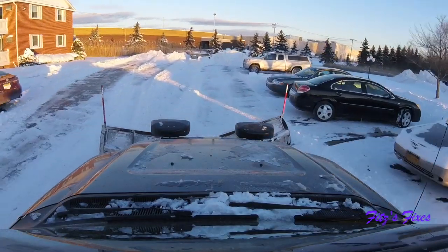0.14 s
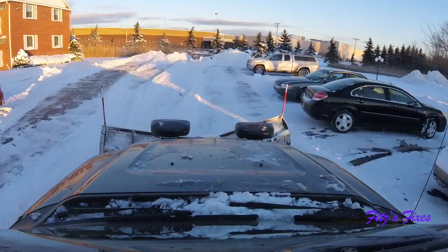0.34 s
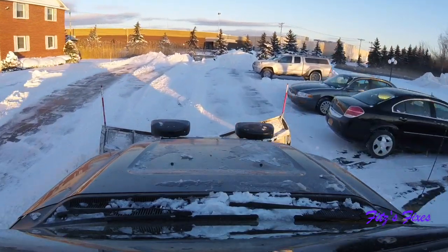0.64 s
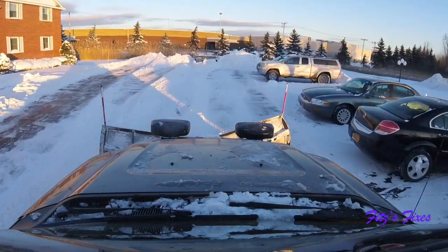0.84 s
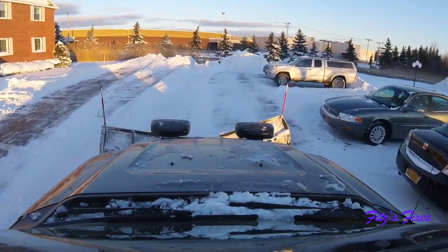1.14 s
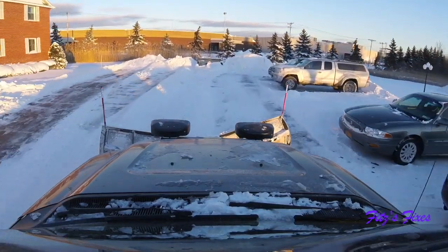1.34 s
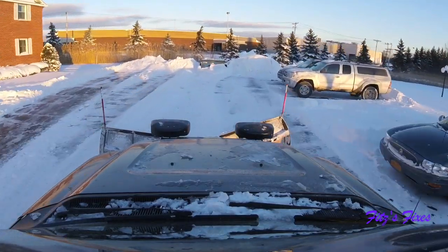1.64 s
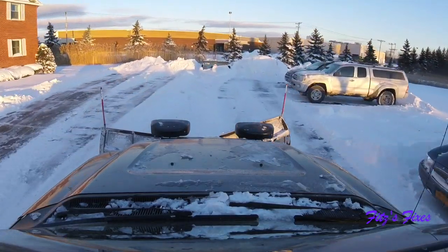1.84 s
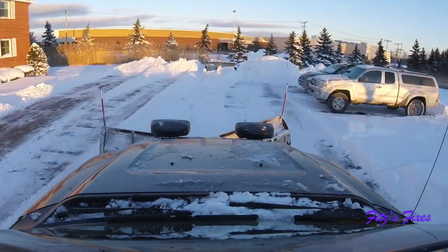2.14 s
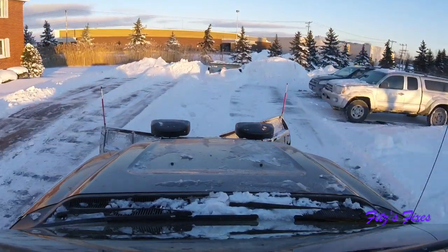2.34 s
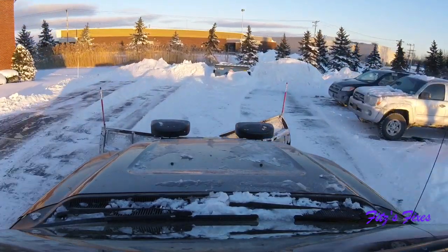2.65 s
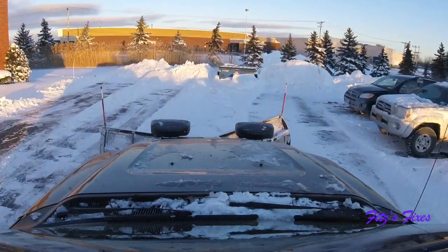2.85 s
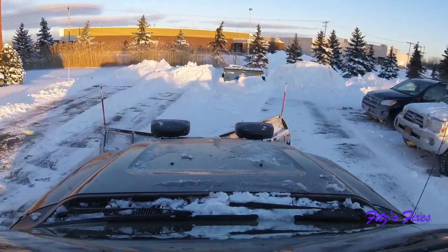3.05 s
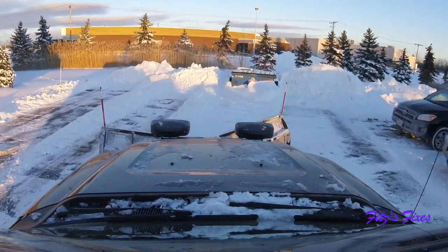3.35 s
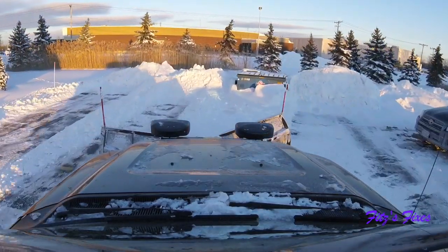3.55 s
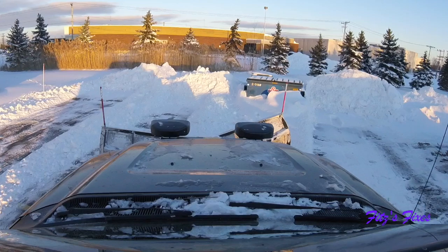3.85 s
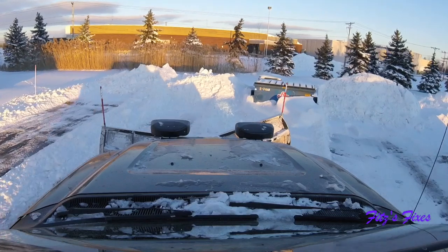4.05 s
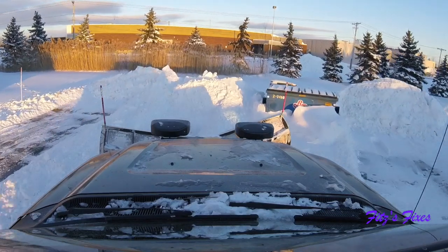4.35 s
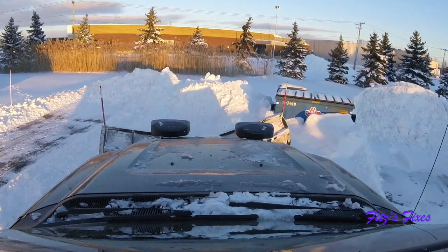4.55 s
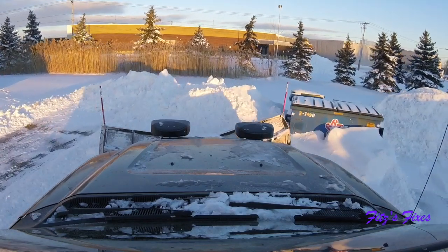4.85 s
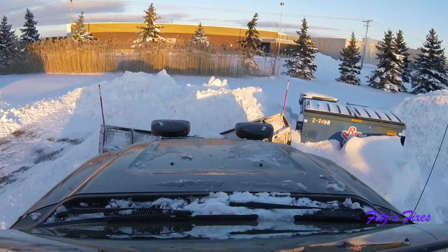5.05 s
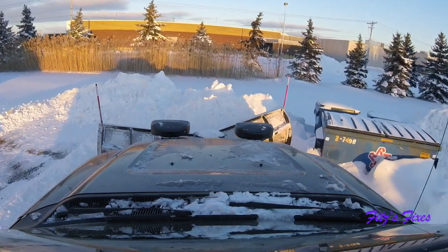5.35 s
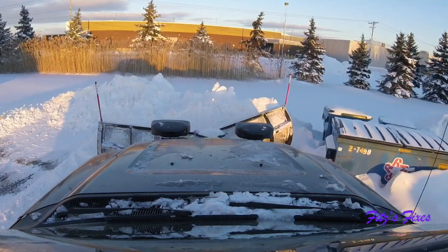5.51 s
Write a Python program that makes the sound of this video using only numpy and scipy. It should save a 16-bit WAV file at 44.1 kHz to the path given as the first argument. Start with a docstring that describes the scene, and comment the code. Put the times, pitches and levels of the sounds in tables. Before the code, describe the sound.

Low engine hum and gusty wind rumble fade as a plow grinds snow with rough bursts, icy ticks and a late thin whine.

```python
"""An engine drones under buffeting wind, which fades as the truck slows: swept orders, filtered noise.
A pickup pushes its plow across a snowy lot; a cased microphone sits above the hood.
The steel blade drags and crunches through packed snow and ice: random grains ring steel, snow and case.
Ticks of ice ping the case, cold snow squeaks, and at the end the lift pump whines in a few harmonics
and one odd partial."""
import sys
import numpy as np
from scipy import signal
from scipy.fft import rfft, irfft
from scipy.io import wavfile

SR = 44100
rng = np.random.default_rng(int(sys.argv[2]) if len(sys.argv) > 2 else 0)


def generate_wav(signal):
    """Clip the signal to [-1, 1] and save it as 16-bit WAV at the path in sys.argv[1]."""
    frames = np.transpose(np.atleast_2d(signal))
    scaled = np.clip(frames, -1, 1) * 32767
    pcm = np.round(scaled).astype(np.int16)
    wavfile.write(sys.argv[1], SR, pcm)


N = 250472
TIME = np.arange(N) / SR  # s

# engine drone: start_s, firing_hz, level_db
ENGINE_COURSE = [(0, 89.36, -25.5), (.5, 91.32, -26.5), (1, 92.2, -27.5), (1.5, 92.07, -24),
                 (1.9, 91.9, -32.5), (2.3, 87.9, -33), (3, 86.96, -34), (3.6, 89, -46.5),
                 (4.8, 91.3, -43.5), (5.15, 73.63, -43), (5.4, 76.2, -40), (5.68, 79, -44)]
# engine orders: multiple_of_firing_rate, relative_db
ENGINE_ORDERS = [(0.374, -12), (0.5, -27), (.625, -2.5), (1, 0.5), (1.625, -12), (2, -12.5), (2.252, -29.5),
                 (3, -18.5), (4.002, -25)]
# exhaust and body resonances swept by the orders: freq_hz, gain_db
BODY_RESPONSE = [(30, 6), (57, 1), (68, 0.5), (78, -2.5), (92, 2), (120, -5.5), (150, 5.5), (175, -0.5),
                 (205, 0), (400, -10)]
# fan and engine bay hiss: freq_hz, density_db_per_hz
BAY_SPECTRUM = [(25, -7.5), (60, 0.5), (120, -9.5), (220, -6), (330, -9), (500, -13), (780, -22),
                (1100, -23.5), (1700, -26), (2800, -33), (4200, -45), (7000, -42), (12500, -40.5)]
# airflow over the case, easing as the truck slows: start_s, relative_db
WIND_COURSE = [(0, -26.5), (1.4, -26.5), (2.3, -29), (3.3, -30), (3.6, -33), (5.1, -41), (5.68, -48)]
# wind rumble: freq_hz, density_db_per_hz
WIND_SPECTRUM = [(10, -8.5), (25, -3.5), (55, 2), (90, -2.5), (130, -6), (190, -12), (270, -20),
                 (400, -27.5), (700, -46), (1500, -68.5)]
# gusts: peak_s, swell_db, half_length_s
GUST_SWELLS = [(0.051, 7, 0.058), (0.176, 9.5, 0.018), (0.307, 9.5, 0.038), (0.42, 3, 0.016),
               (0.512, 4, 0.017), (0.716, 5.5, .04), (0.867, 4, 0.12), (1.172, 8, 0.039), (1.378, 6, 0.028),
               (1.705, 10, 0.042), (1.983, 8, .035), (2.084, 7.5, 0.093), (2.384, 7.5, 0.07),
               (2.585, 7, 0.038), (2.717, 2, 0.054), (2.894, 7, 0.029), (3.43, 2.5, 0.043),
               (4.556, 6.5, .05), (5.088, 10, 0.036)]
# smaller eddies torn off by strong gusts: freq_hz, density_db_per_hz
GUST_SPECTRUM = [(60, -19.5), (140, 4), (260, -4), (400, -10), (700, -22), (1500, -49.5)]
# single eddies striking the case: centre_s, peak_db, pitch_hz
EDDY_STRIKES = [(0.298, -25, 123), (0.405, -9, 135), (1.167, -13, 114), (1.679, -14, 86), (1.977, -17, 119),
                (2.414, -10.5, 77.9), (2.455, -17.5, 328), (2.876, -13.5, 63.7), (3.448, -24, 131.2)]
# steady drag of the blade, until it lifts: start_s, scrape_relative_db, icy_grit_relative_db
BLADE_DRAG = [(0, -42, -60), (1.5, -43, -61), (2.75, -43.5, -63), (3.2, -35.5, -58.5), (3.75, -45, -62),
              (4.7, -43, -61), (5.0, -49, -60), (5.33, -51.5, -67), (5.68, -56, -58.5)]
# ridges of packed snow met by the blade:
# peak_s, scrape_relative_db, icy_grit_relative_db, heap_relative_db, build_up_s, release_s
SNOW_RIDGES = [(1.62, -36.5, -51.5, -46, 0.028, 0.037), (1.82, -39, -57, -40, 0.075, .07),
               (3.07, -30.5, -51.5, -35, 0.061, 0.09), (3.42, -38, -59, -39, 0.079, 0.12),
               (3.62, -45, -55, -43, 0.017, 0.052), (4.04, -39.5, -59, -46.5, 0.15, 0.48),
               (4.25, -32.5, -56, -33.5, 0.076, 0.11), (4.33, -35, -52, -33.5, 0.046, 0.089),
               (4.62, -39.5, -59, -38, 0.0077, .02), (4.932, -34, -56, -30.5, 0.17, 0.066),
               (5.09, -38.5, -55, -37.5, 0.032, 0.058), (5.24, -45, -65, -36, .02, 0.031),
               (5.355, -51.5, -74, -38.5, 0.014, 0.039)]
# scraping edge: freq_hz, density_db_per_hz
SCRAPE_SPECTRUM = [(150, -20), (350, -2), (550, -1.5), (700, 0.5), (850, -2), (950, -5.5), (1300, -12),
                   (1750, -12), (2400, -19), (3300, -30.5), (4300, -41.5), (7000, -68)]
# rumble of the heaped snow: freq_hz, density_db_per_hz
HEAP_SPECTRUM = [(90, -21.5), (160, -9), (205, 3.5), (260, 3), (320, -0.5), (400, -1.5), (520, -10),
                 (650, 1), (1000, -44.5)]
# ringing of the steel blade: freq_hz, width_hz, relative_db
STEEL_MODES = [(390, 25, -3.5), (449, 22, -3.5), (608, 18, -13), (742, 38, 1.5), (777.5, 31, 4.5),
               (1064, 27, -8.5), (1593, 64, -7.5), (1703, 15, -9.5)]
# treble passed by the case in two broad humps: freq_hz, density_db_per_hz
CASE_SPECTRUM = [(2500, -14.5), (4200, -19.5), (4800, -9.5), (5200, 0), (5650, 2), (6080, -8), (6480, 3.5),
                 (6850, -0.5), (7300, -6.5), (8800, -9.5), (9600, -45), (10500, -20)]
# pings of the case when struck hard: freq_hz, width_hz, relative_db
CASE_PING_MODES = [(9160, 140, 2), (9500, 56, -2.5)]
# crusts breaking under the blade: start_s, relative_db, length_s, brightness_db_per_octave
CRUST_BREAKS = [(0.242, -37.5, 0.0096, -0.5), (0.666, -38.5, 0.0064, -2), (0.812, -35.5, 0.0062, -7),
                (1.611, -40.5, .011, -0.5), (1.646, -36, 0.0087, 1), (1.68, -35.5, .017, -5.5),
                (3.039, -33.5, 0.061, -3), (3.15, -34, 0.031, -4.5), (3.377, -38.5, 0.0089, -.5),
                (3.593, -45, .013, 5), (3.614, -38, 0.026, 6), (3.639, -41.5, 0.026, 2.5),
                (3.806, -40, 0.022, 6), (3.95, -42, 0.019, 3.5), (4.212, -32.5, 0.03, -3.5),
                (4.608, -38, 0.023, -3.5), (5.058, -40, 0.015, -5), (5.213, -39.5, 0.015, -2),
                (5.344, -47.5, .02, -8.5)]
# hard ticks of ice: start_s, peak_db, ping_relative_db
ICE_TICKS = [(0.9962, -34.5, -19), (1.8014, -38.5, -22), (1.829, -33, -24), (3.043, -29.5, -8),
             (3.0764, -25, -1), (3.083, -24, -1), (3.1812, -36, -16), (4.032, -33.5, -16),
             (4.224, -30, -12), (4.228, -27, -0.5), (4.2532, -31, -3), (4.268, -23, -6.5),
             (4.2885, -30, -12), (4.351, -23.5, -6), (4.3844, -35, 0), (4.6153, -35, -5), (4.824, -33, -3),
             (4.856, -34.5, 3), (4.932, -33, -4), (4.9635, -29, -7), (5.0588, -34.5, -5), (5.084, -33, -5),
             (5.107, -31, -5), (5.215, -33.5, -5), (5.227, -35.5, -8)]
# squeaks of cold snow on steel: peak_s, level_db, pitch_hz, half_length_s
SNOW_SQUEAKS = [(3.913, -39.5, 1630, 0.012), (5.039, -50, 5600, 0.012)]
# lift pump, sagging under load and then climbing: start_s, shaft_hz
PUMP_COURSE = [(5.2, 291.5), (5.26, 287.5), (5.33, 279.3), (5.44, 288.5), (5.54, 287), (5.67, 299)]
# pump whine: multiple_of_shaft_rate, relative_db
PUMP_PARTIALS = [(4, -1.5), (4.91, 0), (6, -10), (8, -11), (10, -12), (12, -18)]
# microphone response: freq_hz, gain_db
MIC_RESPONSE = [(5, -21.5), (24, 0.5), (9600, -4.5), (10100, -13.5), (13000, -14), (14000, -28)]


def gain_of(db):
    """Decibels to amplitude."""
    return 10 ** (np.asarray(db) / 20)


def evened(x):
    """Scales to an rms of 1."""
    return x / np.sqrt(np.mean(x ** 2) + 1e-20)


def curves(rows):
    """Each column of a table, joined by straight lines at every sample."""
    start_s, *columns = np.transpose(rows)
    return [np.interp(TIME, start_s, column) for column in columns]


def add(mix, start_s, sound):
    """Mixes a sound in at its start time."""
    part = mix[max(round(start_s * SR), 0):][:len(sound)]
    part += sound[:len(part)]


def swell(peak_s, before_s, after_s, shape=2):
    """Hump of height 1, falling to 1/e at the given times; shape 1 is pointed, 2 rounded."""
    length_s = np.where(TIME < peak_s, before_s, after_s)
    distance = np.minimum(abs(TIME - peak_s) / length_s, 20)
    return np.exp(-distance ** shape)


def wander(rate_hz, size=4096):
    """Random drift of rms 1, low-passed near the given rate."""
    coarse_s = np.linspace(0, N / SR, size)
    freq_hz = np.fft.rfftfreq(size, coarse_s[1])
    lowpass = 1 / (1 + (freq_hz / rate_hz) ** 4)
    drift = irfft(rfft(rng.standard_normal(size)) * lowpass)
    return np.interp(TIME, coarse_s, evened(drift))


def coloured(x, spectrum, tilt_db_per_octave=0, size=8192):
    """Causal minimum-phase filter with the given, tilted spectrum; rms 1."""
    freq_hz, db = np.transpose(spectrum)
    table_octave = np.log2(freq_hz)
    octave = np.log2(abs(np.fft.fftfreq(size, 1 / SR)) + 1)
    log_gain = np.log(gain_of(np.interp(octave, table_octave, db + tilt_db_per_octave * table_octave)))
    minimum_phase = np.exp(np.conj(signal.hilbert(log_gain)))
    response = np.fft.ifft(minimum_phase).real[:size // 2]
    return evened(signal.fftconvolve(x, response)[:len(x)])


def grains(per_s, spread_db, length=N):
    """Random clicks, most small and a few large; rms 1."""
    size = gain_of(spread_db * np.minimum(rng.exponential(1, length), 4))
    sign = rng.choice([-1, 1], length)
    present = rng.random(length) < per_s / SR
    return evened(size * sign * present)


def ringing(x, modes):
    """Excites a set of decaying modes with x; rms 1."""
    t = TIME[:SR // 10]
    response = np.zeros(len(t))
    for freq_hz, width_hz, db in modes:
        decay = np.exp(-np.pi * width_hz * t)
        response += gain_of(db) * width_hz * decay * np.sin(2 * np.pi * freq_hz * t)
    return evened(signal.fftconvolve(x, response)[:len(x)])


def engine(jitter=0.0055, flutter_db=2, pulsing=0.3, bay_db=-42, hiss_db_per_octave=10):
    """Firing-rate orders sweep the body resonances, over pulsing engine bay hiss."""
    firing_hz, drone_db = curves(ENGINE_COURSE)
    turns = np.cumsum(firing_hz * (1 + jitter * wander(6.6))) / SR
    drone = np.zeros(N)
    for multiple, order_db in ENGINE_ORDERS:
        body_db = np.interp(multiple * firing_hz, *np.transpose(BODY_RESPONSE))
        amplitude = gain_of(order_db + body_db + flutter_db * wander(5.1))
        drone += amplitude * np.sin(2 * np.pi * (multiple * turns + rng.random()))
    hiss = rng.standard_normal(N) * (1 + pulsing * np.cos(2 * np.pi * turns))
    # the fan slows with the engine; bay_db holds at the top firing rate
    hiss_db = bay_db + hiss_db_per_octave * np.log2(firing_hz / firing_hz.max())
    return gain_of(drone_db) * evened(drone) + gain_of(hiss_db) * coloured(hiss, BAY_SPECTRUM)


def wind(level_db=-2.5, lumpy_db=1.5, gust_db=-13, strong_db=-21):
    """Lumpy turbulence on the case, brighter in gusts, with single pressure swings."""
    flow_db = curves(WIND_COURSE)[0]
    for peak_s, rise_db, half_s in GUST_SWELLS:
        flow_db = flow_db + rise_db * swell(peak_s, half_s, half_s)
    lumps = gain_of(lumpy_db * wander(56))
    rumble = coloured(rng.standard_normal(N) * lumps, WIND_SPECTRUM)
    eddies = coloured(grains(per_s=600, spread_db=1.0) * lumps, GUST_SPECTRUM)
    # eddies grow faster than the rumble
    out = gain_of(flow_db + level_db) * (rumble + gain_of(gust_db + flow_db - strong_db) * eddies)
    for centre_s, peak_db, pitch_hz in EDDY_STRIKES:
        u = np.pi * pitch_hz * (TIME - centre_s)
        out -= gain_of(peak_db) * (1 - 2 * u ** 2) * np.exp(-u ** 2)  # suction between two pushes
    return out


def blade_effort(drag_heap_db=-5.5, ridge_shape=1.2):
    """Scrape, grit and heap strengths: each ridge adds its power to the steady drag."""
    scrape_db, icy_db = curves(BLADE_DRAG)
    heap_db = scrape_db + drag_heap_db  # thin snow on the blade
    power = gain_of([scrape_db, icy_db, heap_db]) ** 2
    for peak_s, *ridge_db, build_s, release_s in SNOW_RIDGES:
        hump = swell(peak_s, build_s, release_s, ridge_shape)
        power += np.outer(gain_of(ridge_db), hump) ** 2
    return np.sqrt(power)


def scrape(scrape_db=-2, steel_db=-4, grit_db=3.5, ping_db=-9, hard_ice_db=-52, judder_db=1.27):
    """The juddering edge crushes grains that sound the blade, its heaped snow and the case."""
    push, ice, load = blade_effort()
    judder = gain_of(judder_db * wander(34))
    edge = coloured(judder * grains(per_s=4900, spread_db=2), SCRAPE_SPECTRUM)
    steel = gain_of(steel_db) * ringing(judder * grains(per_s=1200, spread_db=5), STEEL_MODES)
    heap = coloured(judder * grains(per_s=1300, spread_db=3.5), HEAP_SPECTRUM)
    grit = judder * grains(per_s=9000, spread_db=3.0)
    hardness = np.minimum(ice / gain_of(hard_ice_db), 1)  # harder ice pings the case more
    ping = hardness * gain_of(ping_db) * ringing(grit, CASE_PING_MODES)
    treble = coloured(grit, CASE_SPECTRUM) + ping
    blade = push * (edge + steel) + load * heap
    return gain_of(scrape_db) * blade + gain_of(grit_db) * ice * treble


def crunches(case_db=-19, steel_db=-7):
    """Each crust gives way in a short shower of cracks."""
    out, t = np.zeros(N), TIME[:SR // 5]
    for start_s, db, length_s, tilt_db in CRUST_BREAKS:
        cracks = grains(per_s=3700, spread_db=1.5, length=len(t)) * np.exp(-(t / length_s) ** 2)
        tilted_modes = [(hz, width_hz, mode_db + tilt_db * np.log2(hz)) for hz, width_hz, mode_db in STEEL_MODES]
        sound = coloured(cracks, SCRAPE_SPECTRUM, tilt_db)
        sound += gain_of(steel_db) * ringing(cracks, tilted_modes)
        sound += gain_of(case_db + tilt_db) * coloured(cracks, CASE_SPECTRUM)
        # rms 1 over the whole window becomes roughly rms 1 over the burst
        add(out, start_s, gain_of(db) * np.sqrt(length_s / t[-1]) * sound)
    return out


def ticks(chatter=0.25, chatter_s=0.0026):
    """A sharp contact and its brief chatter ring the case."""
    out, t = np.zeros(N), TIME[:SR // 20]
    for start_s, peak_db, ping_db in ICE_TICKS:
        contact = (t == 0) + chatter * rng.standard_normal(len(t)) * np.exp(-t / chatter_s)
        ping = gain_of(ping_db) * ringing(contact, CASE_PING_MODES)
        ring = coloured(contact, CASE_SPECTRUM) + ping
        add(out, start_s, gain_of(peak_db) * ring / abs(ring).max())
    return out


def squeaks(width_hz=90):
    """Stick and slip hold one resonance for a moment: noise through one mode."""
    out = np.zeros(N)
    for peak_s, db, pitch_hz, half_s in SNOW_SQUEAKS:
        tone = ringing(rng.standard_normal(N), [(pitch_hz, width_hz, 0)])
        out += gain_of(db) * swell(peak_s, half_s, half_s) * tone
    return out


def pump(level_db=-58.5, rise_s=0.06, jitter=0.00082, flutter_db=1.8):
    """The hydraulic pump whines at multiples of its shaft rate as the blade lifts."""
    shaft_hz, = curves(PUMP_COURSE)
    turns = np.cumsum(shaft_hz * (1 + jitter * wander(30))) / SR
    whine = np.zeros(N)
    for multiple, db in PUMP_PARTIALS:
        amplitude = gain_of(db + flutter_db * wander(13))
        whine += amplitude * np.sin(2 * np.pi * (multiple * turns + rng.random()))
    fade_in = np.clip((TIME - PUMP_COURSE[0][0]) / rise_s, 0, 1)
    return gain_of(level_db) * evened(whine) * fade_in


def scene():
    """All sources at the one microphone."""
    return (engine() + wind() + scrape() + crunches() + ticks() + squeaks() + pump())[None]


def record(dry, edge_hz=14000):
    """The microphone's dull top, then a steep band limit."""
    response = gain_of(np.interp(np.fft.rfftfreq(N, 1 / SR), *np.transpose(MIC_RESPONSE)))
    heard = irfft(rfft(dry) * response, N)
    lowpass = signal.firwin(511, edge_hz, window=("kaiser", 9), fs=SR)
    return signal.oaconvolve(heard, lowpass[None], "same")


dry = scene()
out = record(dry)
generate_wav(out)
```